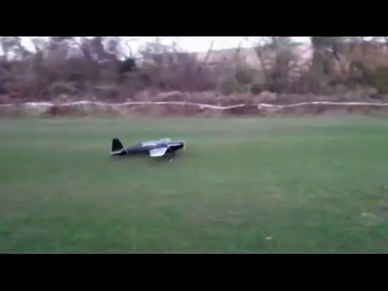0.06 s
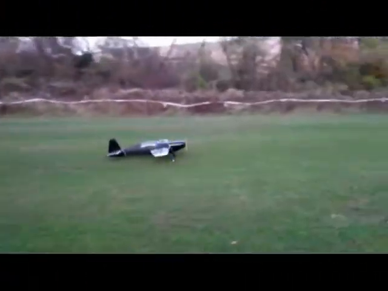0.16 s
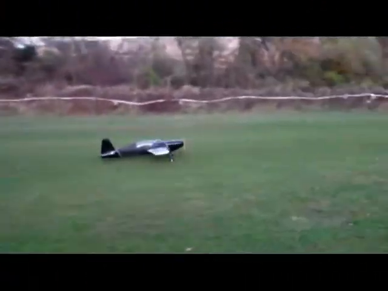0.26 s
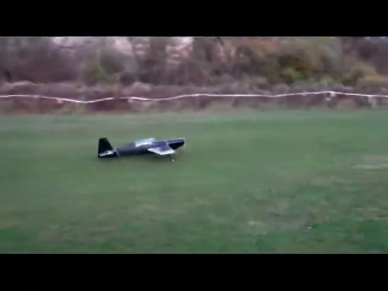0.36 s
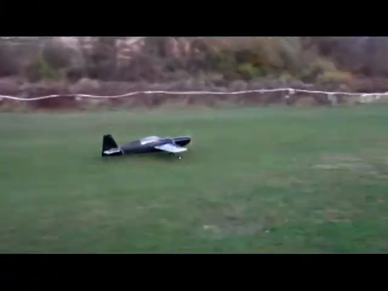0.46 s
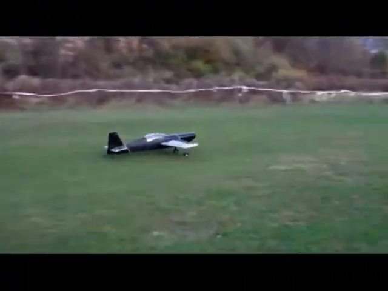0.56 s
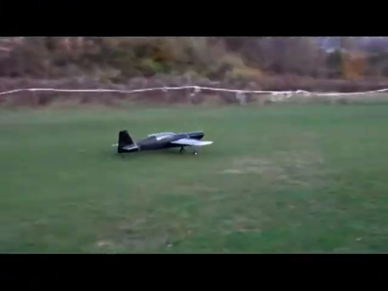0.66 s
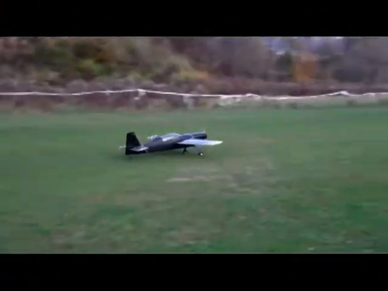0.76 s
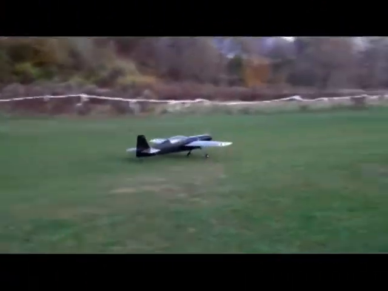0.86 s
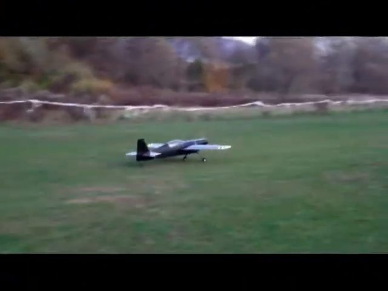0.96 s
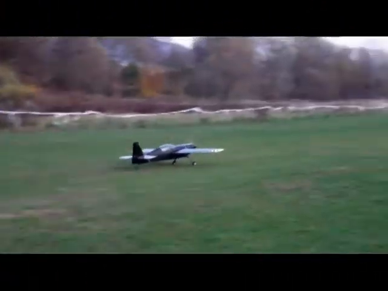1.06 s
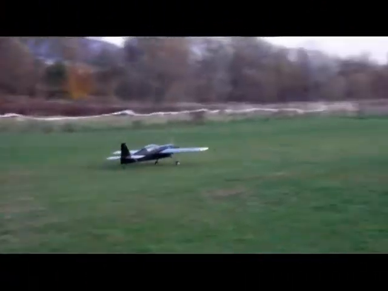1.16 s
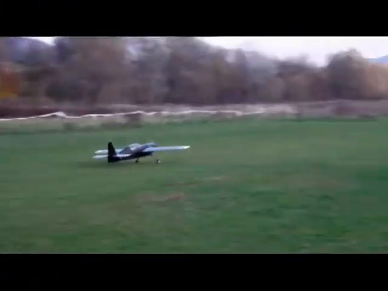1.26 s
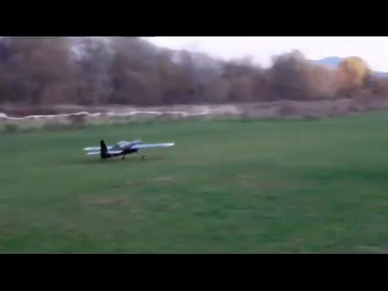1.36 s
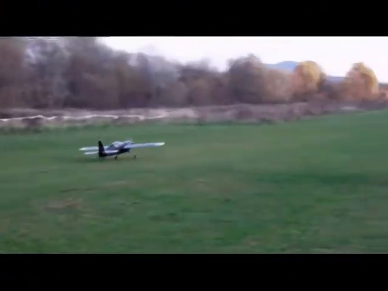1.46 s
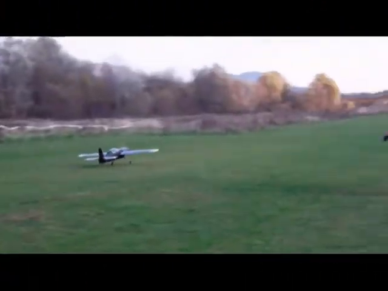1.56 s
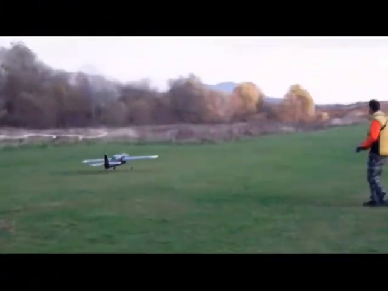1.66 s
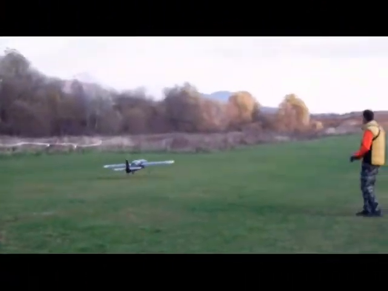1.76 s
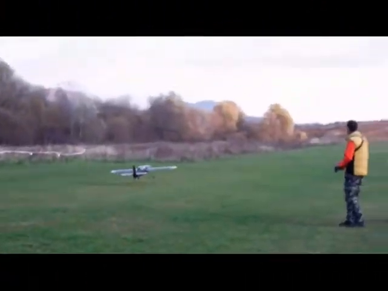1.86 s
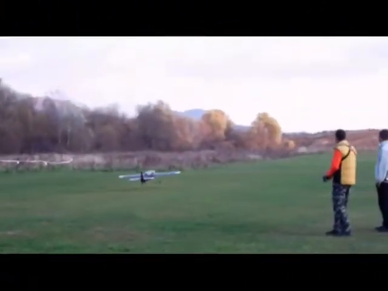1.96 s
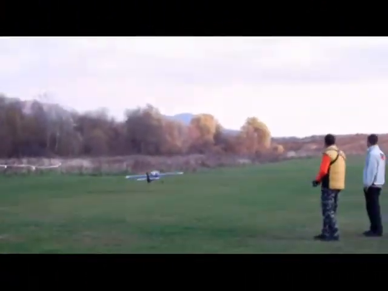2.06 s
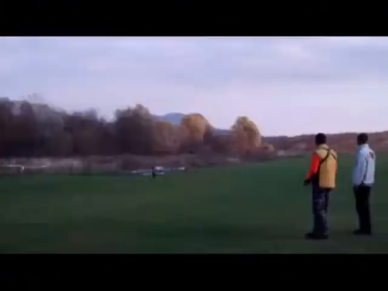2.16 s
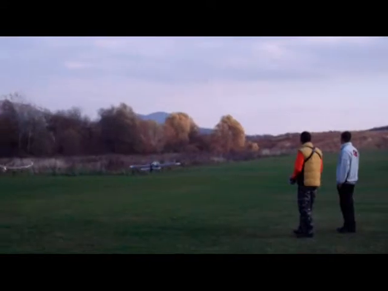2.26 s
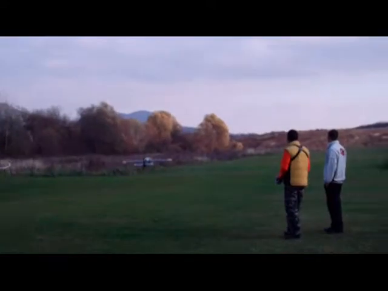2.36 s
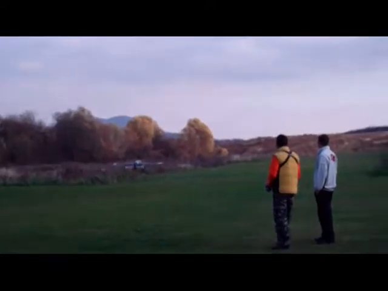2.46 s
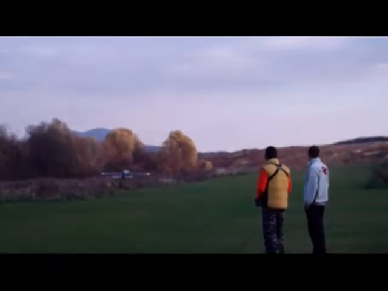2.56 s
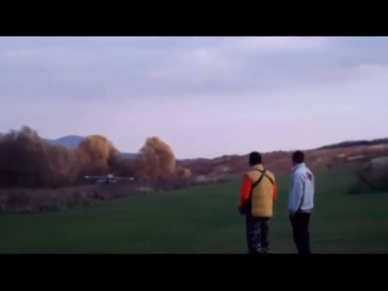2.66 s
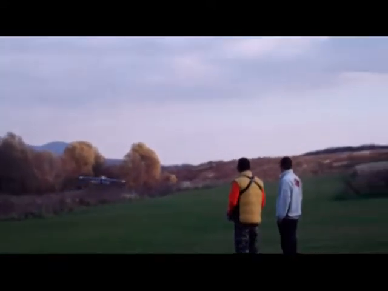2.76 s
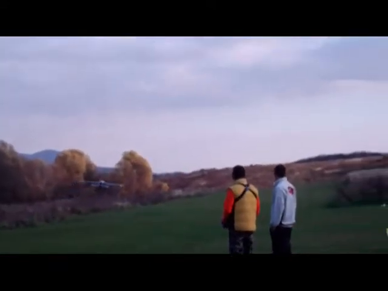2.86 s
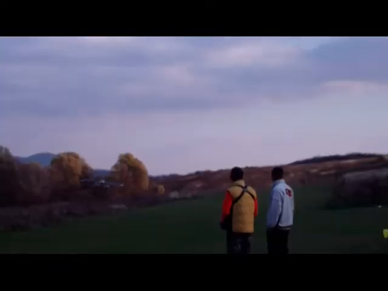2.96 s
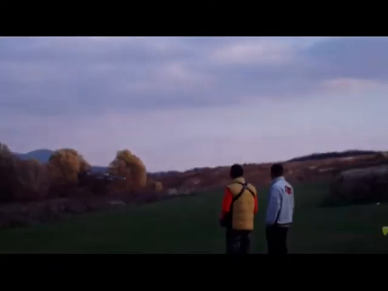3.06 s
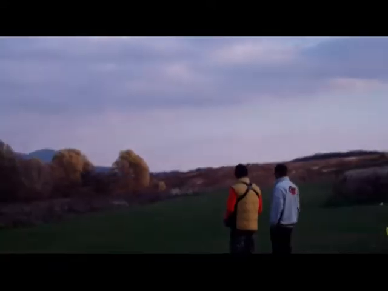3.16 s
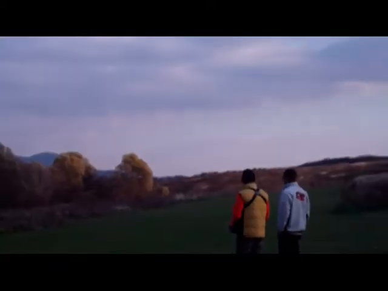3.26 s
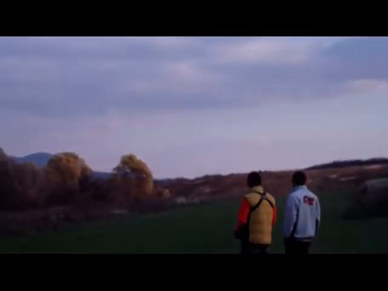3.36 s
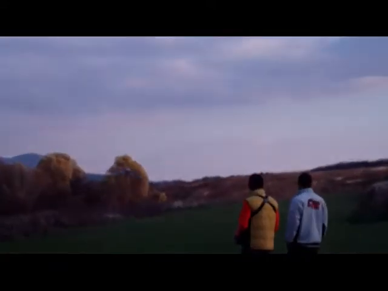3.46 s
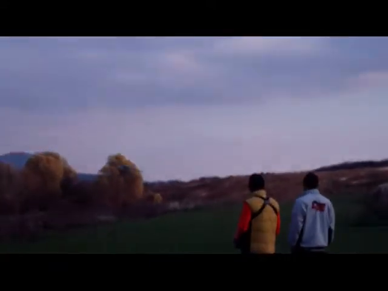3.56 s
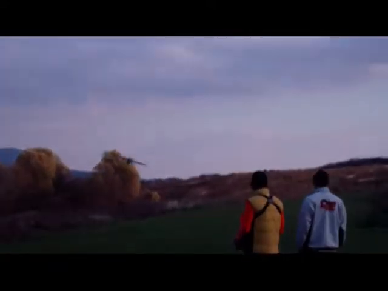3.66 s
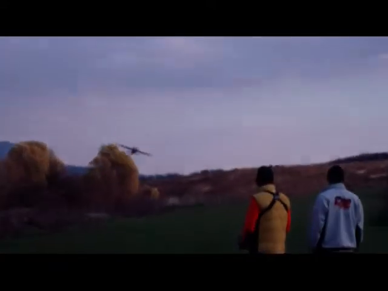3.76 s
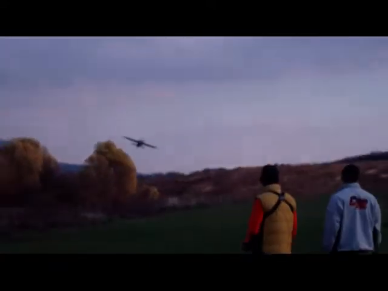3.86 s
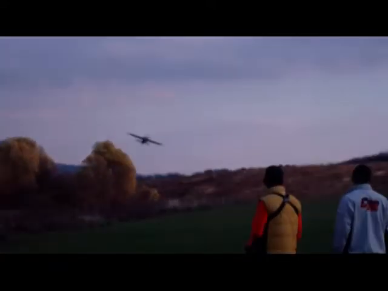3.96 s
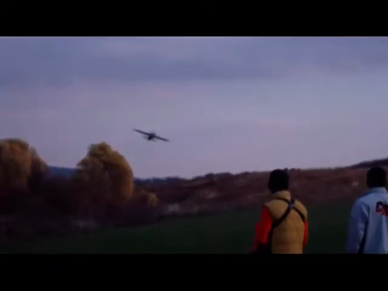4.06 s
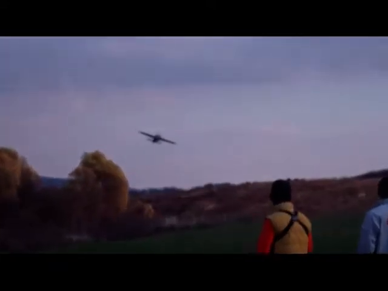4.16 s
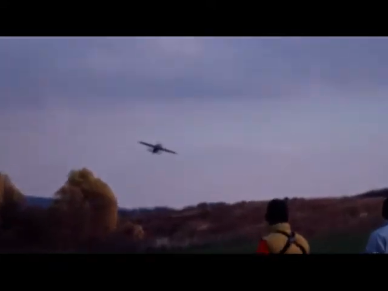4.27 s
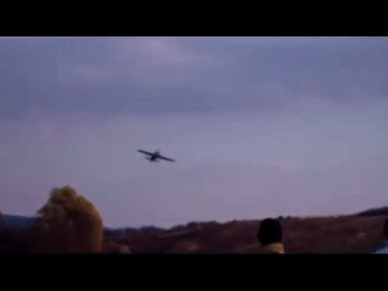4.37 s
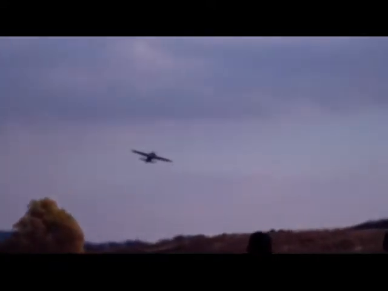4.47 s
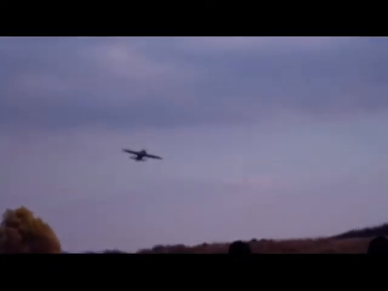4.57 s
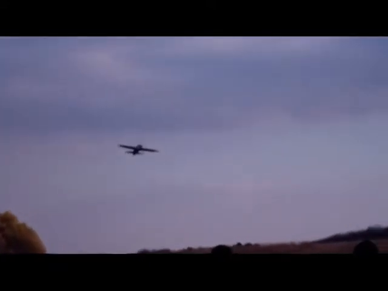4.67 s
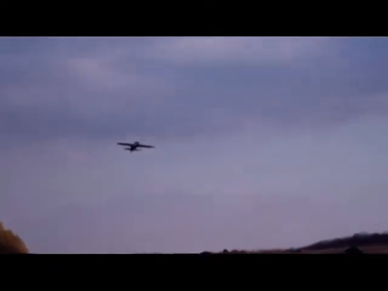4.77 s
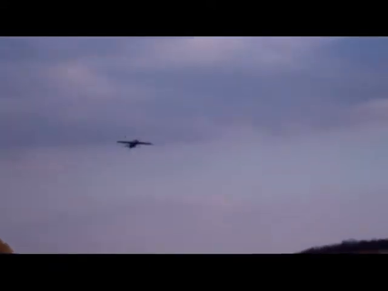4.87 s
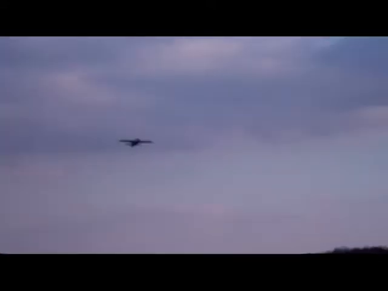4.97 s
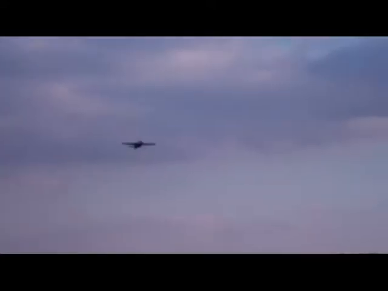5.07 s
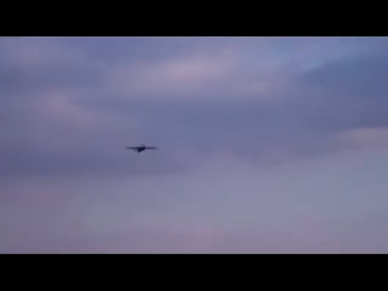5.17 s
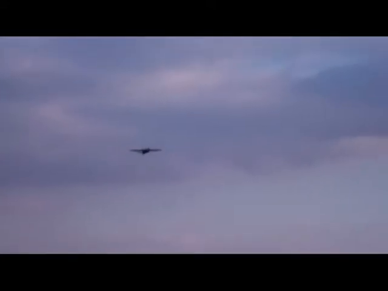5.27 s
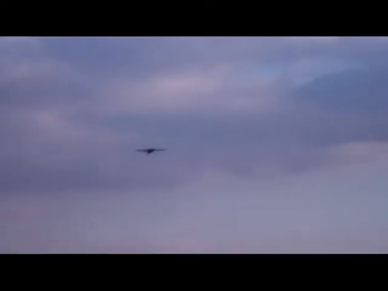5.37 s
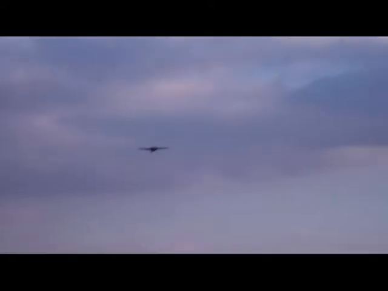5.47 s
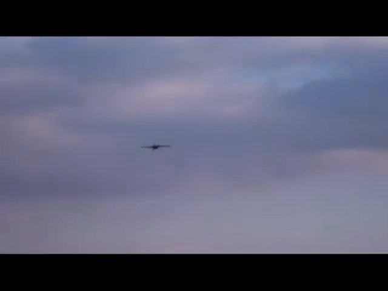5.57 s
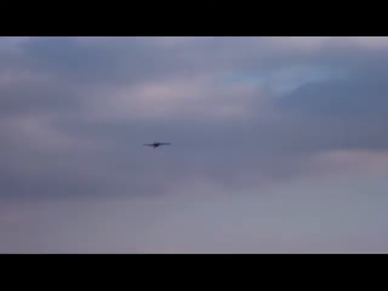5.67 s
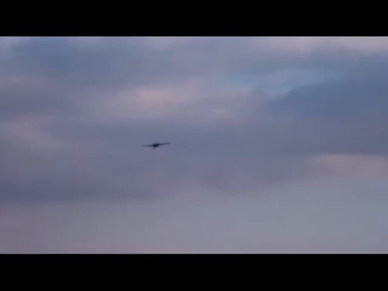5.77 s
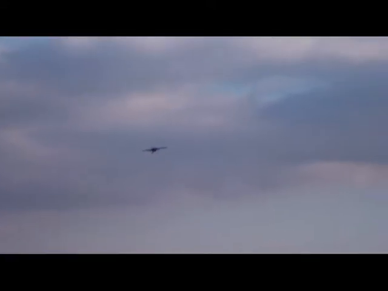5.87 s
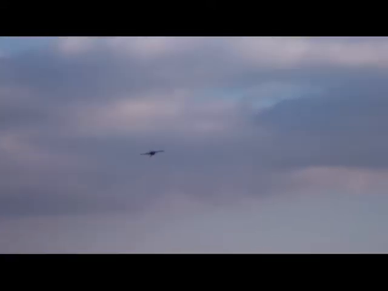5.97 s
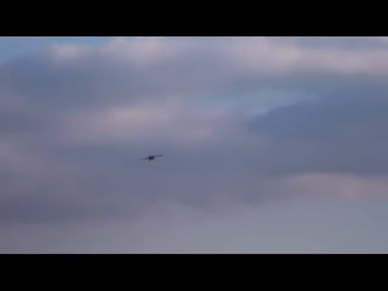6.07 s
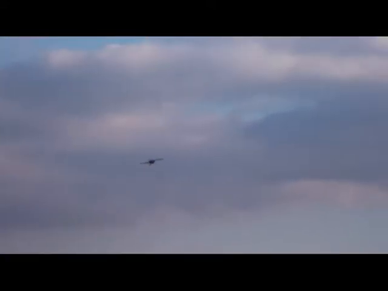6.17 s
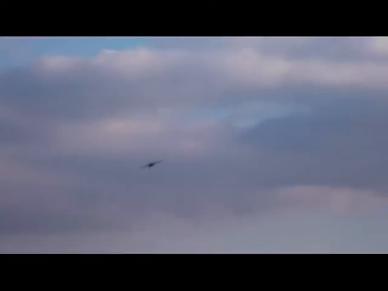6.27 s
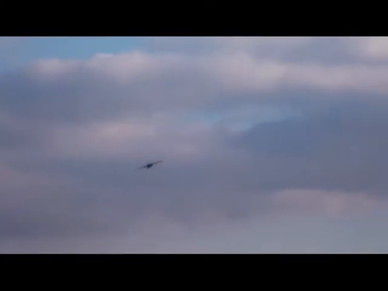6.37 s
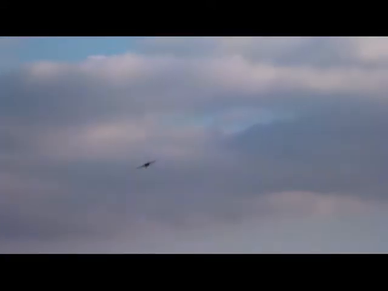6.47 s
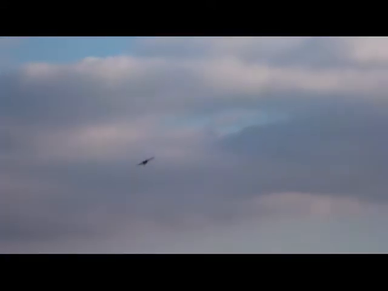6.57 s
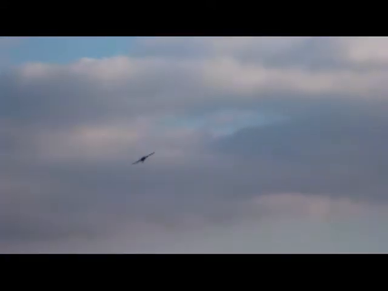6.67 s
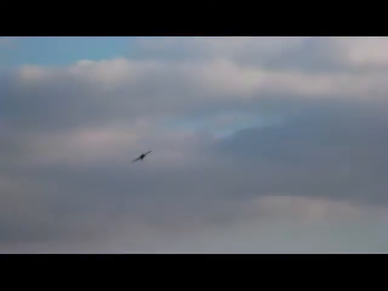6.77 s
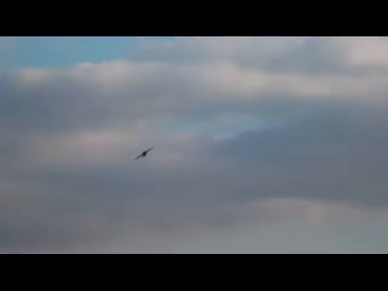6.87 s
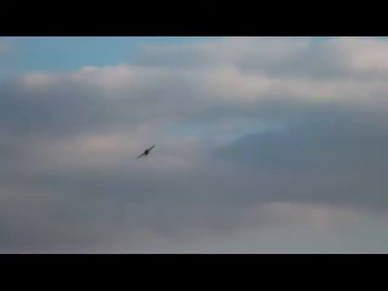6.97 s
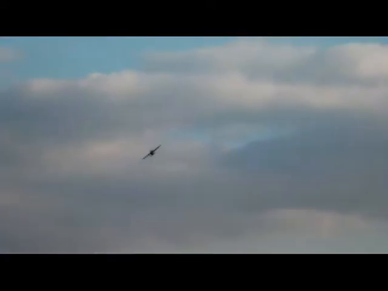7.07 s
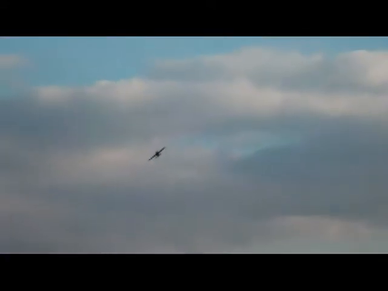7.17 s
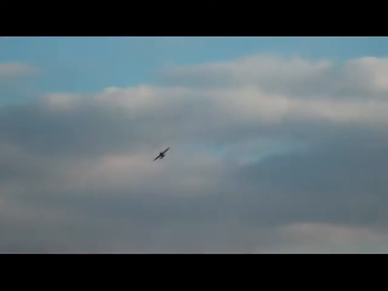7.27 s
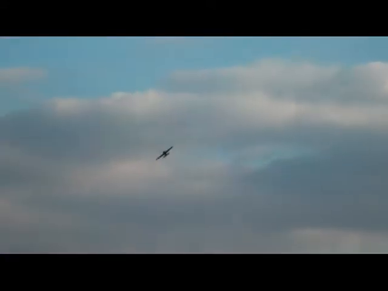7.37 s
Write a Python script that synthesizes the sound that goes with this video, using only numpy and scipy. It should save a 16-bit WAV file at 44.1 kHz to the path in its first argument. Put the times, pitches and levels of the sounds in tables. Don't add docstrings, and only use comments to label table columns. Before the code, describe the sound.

Harsh, rising miniature engine snarl with rushing exhaust gas passes close, then thins to a steady distant drone beneath camera hiss and mechanical whirring.

```python
import sys
import numpy as np
from scipy import signal
from scipy.fft import rfft, irfft, next_fast_len
from scipy.io import wavfile
from scipy.ndimage import uniform_filter1d

SR = 44100
rng = np.random.default_rng(int(sys.argv[2]) if len(sys.argv) > 2 else 0)


def to_wav(sig):
    pcm = np.clip(np.atleast_2d(sig), -1, 1) * 32767
    pcm = np.round(pcm).astype(np.int16)
    wavfile.write(sys.argv[1], SR, pcm.T)


def linear_from_db(decibels):
    return 10 ** (np.asarray(decibels, float) / 20)


N = 327663
T = np.arange(N) / SR

# time_s, half_length_s, level_db
GUSTS = [
    (0, .07, -20),
    (.5, 0.25, -36),
    (1.103, .12, -42),
    (1.63, .14, -32),
    (2.271, .09, -45),
    (5.63, 0.32, -54),
    (7.43, 0.26, -62),
]
BREEZE_DB = -46.5
# freq_hz, level_db_per_hz
HISS_COLOUR = [(20, -14), (300, -21), (900, -22.5), (2300, -10.5), (2800, -11), (3600, -32), (7000, -31),
               (7800, -30), (8020, -20), (8300, -40), (11000, -33.5), (13900, -37.5), (14500, -24),
               (15250, -25)]
HISS_DB = -32
# freq_hz, level_db
WHINE = [
    (7445, -43.5),
    (14890, -50.5),
    (15106, -62),
]
WHINE_WOBBLE = 0.00048
# start_s, stop_s, whir_db, start_clack_db
LENS_RUNS = [
    (2.308, 2.63, -19.5, -28),
    (3.208, 4.47, -19.5, -10),
]
# time_s, level_db
TWITCHES = [
    (6.07, -27.5),
    (6.18, -29),
    (6.295, -25),
    (6.39, -29),
]
# freq_hz, level_db_per_hz
LENS_COLOUR = [(760, -25), (1300, -11), (1600, -14), (1980, -2), (2260, -4), (2450, 2), (2710, 5),
               (3110, -6), (3680, -30), (5840, -26.5), (6360, -25), (7740, -27), (10000, -49.5),
               (13000, -76), (22000, -120)]
# freq_hz, level_db
UNLIKE = [(300, -40), (900, -20), (1800, -24), (2800, -25), (3800, -12), (5500, -12), (7500, -16),
          (10000, -10), (14000, -7)]
# freq_hz, level_db
LAG_SHARE = [(100, -4), (400, -10), (1200, 0), (16000, -0.5)]

# time_s, shaft_hz
SHAFT = [(0, 83.53), (.1, 88.95), (.2, 91.73), (.4, 96.65), (.95, 97.26), (1.3, 96.36), (1.9, 96.16),
         (2.4, 97.76), (3.4, 97.9), (4.3, 101.4), (4.8, 100.8), (5.1, 101), (5.6, 101.6), (6.0, 101.3),
         (6.4, 101.9), (7.43, 102.3)]
# time_s, speed_lost_hz, firing_lost_0_1
MISFIRES = [
    (.59, 1.18, .1),
    (1.05, 2.67, 0.1),
    (3.5, 1.16, 0.82),
    (3.91, 1.24, 0.48),
    (4.84, 1.23, 0.2),
    (5.64, 3.3, 0.3),
    (6.08, 1.07, .1),
]
SAG_S, SAG_S_PER_HZ = .025, .009
# time_s, shaft_turns
PHASE_SKIP = (2.315, -0.2325)
# time_s, level_db, tail_towards_listener_0_1, lowest_turf_null_hz
FLIGHT = [(0.0, -0.5, 0.43, 467), (0.12, 0.5, 0.34, 547), (0.28, 1.5, 0.13, 560), (0.5, 3, 0.2, 594),
          (0.66, 3.2, 0.85, 645), (0.8, 0.5, 1, 585.3), (0.95, 2.5, 0.63, 516), (1.1, -4, 1.0, 696),
          (1.3, 0.0, 0.76, 645.2), (1.9, -1, 0.44, 584), (2.25, -3.5, 0.41, 645), (2.75, -8, 0.17, 503),
          (3.3, -11, 0.31, 508.6), (3.9, -11, 0.54, 493), (4.7, -10, 0.69, 379), (5.5, -11.5, 0.87, 311.3),
          (6.3, -15.5, 0.54, 316), (7.43, -14, 0.72, 296.8)]
# time_s, lowest_null_hz
GROUND = [(0, 1390), (.9, 1430), (1.3, 1380), (2, 1120), (2.35, 1080), (2.68, 519), (3.05, 620), (4, 500),
          (4.6, 480), (5.3, 403), (6.2, 355), (7.43, 340)]
# multiple, nose_on_db, tail_on_gain_db, airborne_gain_db
ORDER_DB = [(1.0, -25, -13.5, 6.5), (2.0, -11.5, -7.5, 2.5), (3.0, -20.5, 8.5, 2), (4.0, -17, -11, -8.5),
            (5.0, -14.5, -2.5, -14.5), (6.0, -12, -3.5, -5), (7.0, -22.5, 6, -0.6), (8.0, -23, 4.8, -2.9),
            (9.0, -31.5, -9, -4.2), (10.0, -51, 14.5, 8.5)]
SPOOL_LOSS_DB = [16, -2, 6, 6, -1.5, 3, 5, -2, 3, 0]
SPOOL_S, SPOOL_HALF_S = .2, 0.16
AIRBORNE_S, CLIMB_S = 1.7, 0.83
TURF_SHARE, TURF_SOAK_HZ = 1.154, 1240
NEAR_FLUTTER_DB, NEAR_S = 2, 1.6
DUCK_S, DUCK_DB, DUCK_BACK_S = 0.92, -0.5, .08
SHADE_S, SHADE_HALF_S, SHADE_DB = 2.46, 0.38, 10

# multiple, level_db
UPPER = [(1, -11), (2, 0), (3, -7), (4, -27), (5, -16), (6, -4), (7, -3), (8, -6), (9, -19.5), (10, -21.5),
         (11, -23.5), (12, -21), (13, -20.5), (14, -25), (15, -20.5), (16, -23.5), (17, -22), (18, -25.5),
         (19, -23.5), (20, -35), (21, -23), (22, -21), (23, -33), (24, -18.5), (25, -33), (26, -19),
         (27, -15), (28, -39), (29, -30.5), (30, -19.5)]
# time_s, buzz_db
GAS = [(.02, -8.5), (.2, -11.5), (.48, -13), (.6, -9.5), (.7, -12), (.8, -7.5), (.955, -11), (.985, -15),
       (1.31, -15), (1.75, -19), (1.95, -18), (2.11, -17.5), (2.85, -27.5), (4.55, -29.5), (4.8, -25.5),
       (5.1, -28), (6.4, -36.5), (7.43, -33)]
# freq_hz, level_db_per_hz
GAS_COLOUR = [(40, -25.5), (100, -14), (300, -8.5), (800, -17), (1200, -31), (1800, -25.5), (2900, -7.5),
              (3200, -19.5), (3800, -38.5), (5500, -35.5), (6500, -46), (7500, -38.5), (8600, -41.5),
              (15000, -79.5)]
GAS_EDGES_HZ = [30, 900, 1750, 3700, 6800, 16000]
# level_db, spreading_loss_share, jet_level_share
GAS_RULES = [
    (-13.5, 0.55, 0.49),
    (-21, 0.95, 0.59),
    (-25, 1, 0.41),
]
CLOSEST_S, CLOSEST_M, AWAY_M_S = 0.59, 6.95, 11.4
SURGE_S, SURGE_HALF_S, SURGE_DB = 0.057, 0.063, 6.5


def columns(table):
    time_s, *rest = np.transpose(table)
    return [np.interp(T, time_s, column) for column in rest]


def swell(centre_s, half_s):
    return np.exp(-((T - centre_s) / half_s) ** 2)


def unit(x):
    return x / np.sqrt(np.mean(x ** 2))


def colour(x, points):
    size = next_fast_len(N)
    hz, db = np.transpose(points)
    bin_hz = np.arange(size // 2 + 1) * SR / size
    gain = linear_from_db(np.interp(np.log(bin_hz + 1), np.log(hz), db))
    return irfft(rfft(x, size) * gain, size)[:N]


def band(x, lo_hz, hi_hz):
    sos = signal.butter(3, [lo_hz, hi_hz], "band", fs=SR, output="sos")
    return signal.sosfilt(sos, x)


def walk(rate_hz):
    knots = rng.standard_normal(int(N / SR * rate_hz) + 2)
    joined = np.interp(T * rate_hz, np.arange(len(knots)), knots)
    return 1.4 * uniform_filter1d(joined, int(SR / rate_hz))


def wind():
    force = linear_from_db(BREEZE_DB) + sum(linear_from_db(db) * swell(s, half_s) for s, half_s, db in GUSTS)
    rumble = unit(band(rng.standard_normal(N), 20, 66))
    return force * linear_from_db(2.5 * walk(7)) * rumble


def whine():
    drift_s = T + WHINE_WOBBLE * np.cumsum(walk(30)) / SR
    return sum(np.sqrt(2) * linear_from_db(db + .5 * walk(20)) * np.sin(2 * np.pi * hz * drift_s) for hz, db in WHINE)


def input_hiss():
    return linear_from_db(HISS_DB) * unit(colour(rng.standard_normal(N), HISS_COLOUR))


def lens_drive():
    effort = sum(linear_from_db(db) * swell(s, .018) for s, db in TWITCHES)
    clack = 0
    for start_s, stop_s, whir_db, clack_db in LENS_RUNS:
        running = np.clip((T - start_s) / .003, 0, 1) * np.clip((stop_s - T) / .02, 0, 1)
        effort = effort + running * linear_from_db(whir_db)
        clack = clack + running * linear_from_db(clack_db) * swell(start_s, .012)
    return effort * linear_from_db(.4 * walk(25) + 1.2 * walk(300)), clack


def camera():
    teeth = rng.standard_normal(N)
    effort, clack = lens_drive()
    whir = colour(effort * teeth, LENS_COLOUR) / np.std(colour(teeth, LENS_COLOUR))
    knock = band(band(clack * teeth, 1800, 3200), 1800, 3200) / np.std(band(teeth, 1800, 3200))
    port = linear_from_db(-39) * unit(band(teeth, 2300, 2497))
    return whir + 1.2 * knock + port + input_hiss()


def shaft():
    hz = columns(SHAFT)[0] + .15 * walk(25) + .2 * walk(90)
    for s, lost_hz, _ in MISFIRES:
        after = np.clip(T - s, 0, None) / (SAG_S + SAG_S_PER_HZ * lost_hz)
        hz = hz - lost_hz * after * np.exp(1 - after)
    skip_s, skip_turns = PHASE_SKIP
    return np.cumsum(hz) / SR + skip_turns * np.clip((T - skip_s) / 0.001006, 0, 1)


def grass(x):
    delay_s = .5 / columns(GROUND)[0]
    late = np.interp(T - delay_s, T, x)
    return x + .55 * uniform_filter1d(late, size=11)


def heard_db(order):
    level_db, tail, null_hz = columns(FLIGHT)
    _, nose_db, tail_db, climb_db = ORDER_DB[order - 1]
    hz = order * columns(SHAFT)[0]
    mirror = TURF_SHARE * np.exp(-hz / TURF_SOAK_HZ + 1j * np.pi * hz / null_hz)
    turf_db = 20 * np.log10(abs(1 + mirror))
    airborne = 1 / (1 + np.exp((AIRBORNE_S - T) / CLIMB_S))
    flutter_db = NEAR_FLUTTER_DB * (order > 3) * swell(0, NEAR_S) * walk(10.36)
    spool_db = SPOOL_LOSS_DB[order - 1] * swell(SPOOL_S, SPOOL_HALF_S)
    shade_db = SHADE_DB * (order in (5, 7, 9)) * swell(SHADE_S, SHADE_HALF_S)
    duck_db = DUCK_DB * (T > DUCK_S) * np.exp(-np.abs(T - DUCK_S) / DUCK_BACK_S)
    source_db = level_db + nose_db + tail_db * tail + climb_db * airborne
    return source_db + turf_db + flutter_db - spool_db - shade_db - duck_db


def tone(turns, order, gain_db=0, lead_turns=0.):
    level = linear_from_db(heard_db(order) + gain_db + .5 * walk(12))
    return np.sqrt(2) * level * np.cos(2 * np.pi * (order * turns + lead_turns))


def gas_levels():
    buzz_db = columns(GAS)[0]
    spread_db = -20 * np.log10(np.hypot(1, AWAY_M_S * (T - CLOSEST_S) / CLOSEST_M))
    rasp_db, sizzle_db, hiss_db = (db + far * spread_db + jet * buzz_db for db, far, jet in GAS_RULES)
    surge_db = SURGE_DB * swell(SURGE_S, SURGE_HALF_S)
    return rasp_db + surge_db, buzz_db, sizzle_db, hiss_db + surge_db


def gas(turns, levels_db):
    puff = 1 + 0.24 * np.cos(2 * np.pi * (turns + 0.29)) + 0.24 * np.cos(4 * np.pi * (turns + 0.18))
    puff = puff * linear_from_db(.8 * rng.standard_normal(2000))[(2 * turns).astype(int)]
    noise = grass(colour(puff * rng.standard_normal(N), GAS_COLOUR))
    trims_db = (0.27, 3.4, 0.68, 8.1, 8.2)
    total = 0
    for db, trim_db, lo_hz, hi_hz in zip(levels_db, trims_db, GAS_EDGES_HZ, GAS_EDGES_HZ[1:]):
        total = total + linear_from_db(db + trim_db + 0.19 * walk(13)) * unit(band(noise, lo_hz, hi_hz))
    return total


def crack(turns, orders):
    angle = np.linspace(0, 1, num=1025)
    shape = 0
    for k, db in UPPER:
        if k in orders:
            shape = shape + linear_from_db(db) * np.cos(2 * np.pi * (k * angle - .025 * (k - 8) ** 2))
    return np.interp(turns % 1, angle, shape)


def firing_strength(turns):
    strength = linear_from_db(.7 * rng.standard_normal(1000))[(turns + .5).astype(int)]
    for s, _, lost in MISFIRES:
        strength = strength * (1 - np.clip(lost, 0, 1) * (np.abs(T - s) < .005))
    return uniform_filter1d(strength, size=60)


def exhaust(turns, rasp_db, buzz_db):
    low = tone(turns, 3) + tone(turns, 5)
    ring = sum(tone(turns, order, lead_turns=.3) for order in (6, 7, 8))
    ring = ring + tone(turns, 9, gain_db=3) + tone(turns, 10, gain_db=1, lead_turns=.15)
    edge = linear_from_db(0.83 * rasp_db + 10) * crack(turns, range(11, 18))
    edge = edge + linear_from_db(buzz_db + 6.5) * crack(turns, range(18, 31))
    return (low + ring + grass(edge)) * firing_strength(turns)


def propeller(turns):
    return tone(turns, 2) + tone(turns, 4) - tone(turns, 1)


def scene():
    turns = shaft()
    rasp_db, buzz_db, sizzle_db, hiss_db = gas_levels()
    jet_db = (1.15 * rasp_db + 4, rasp_db, buzz_db, sizzle_db, hiss_db)
    noisy = camera() + gas(turns, jet_db)
    mid = wind() + whine() + noisy + exhaust(turns, rasp_db, buzz_db) + propeller(turns)
    unlike = colour(np.r_[noisy[900:], noisy[-900:]], UNLIKE)
    late = colour(np.roll(mid, 1) - mid, LAG_SHARE)
    return np.array([mid + late - unlike, mid + unlike])


def low_pass(x):
    return signal.sosfilt(signal.butter(12, 15200, fs=SR, output="sos"), x)


def record(dry):
    loud = dry + .009
    mix = loud / (1 + np.abs(loud) ** 8) ** (1 / 8)
    return low_pass(mix)


dry = scene()
out = record(dry)
to_wav(out)
```